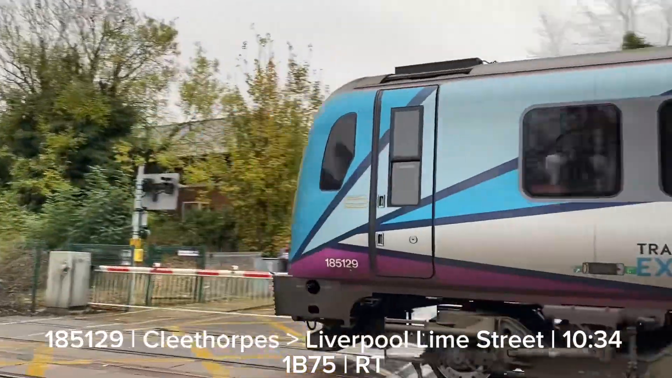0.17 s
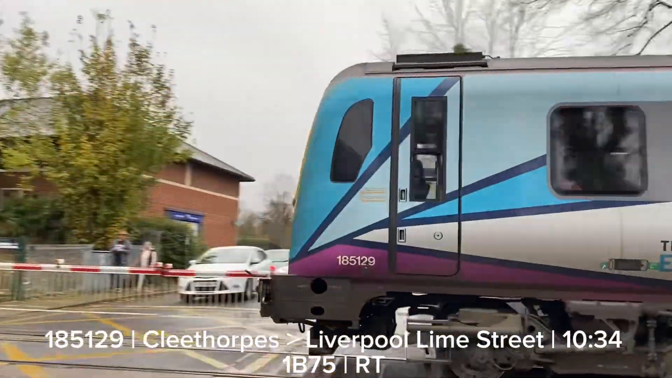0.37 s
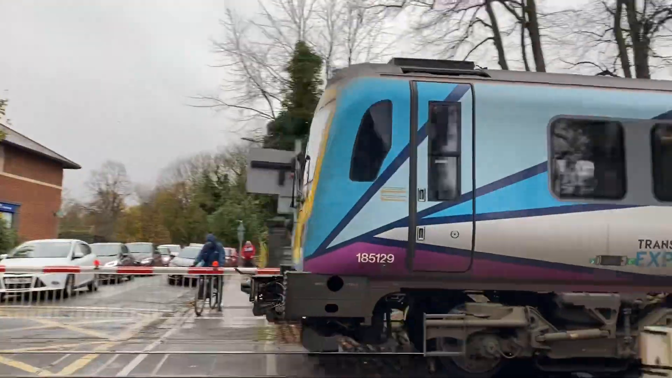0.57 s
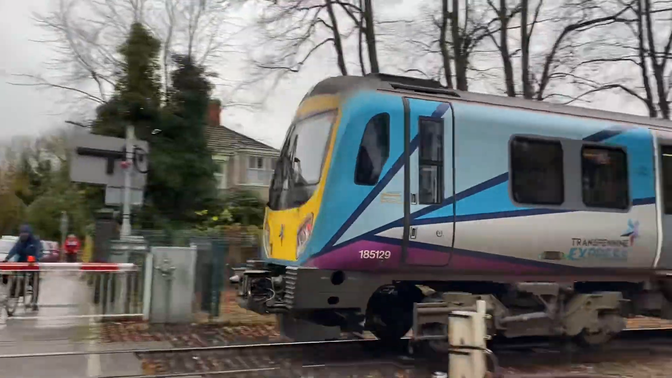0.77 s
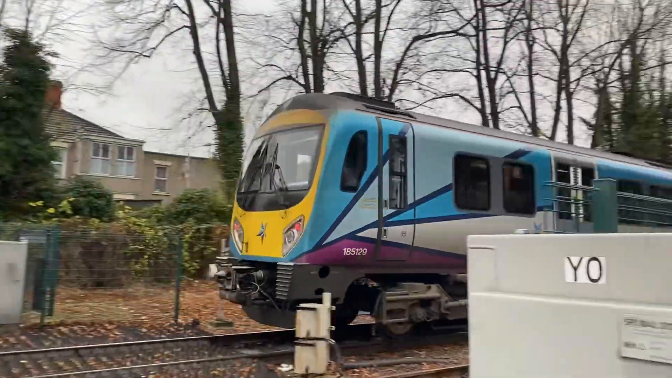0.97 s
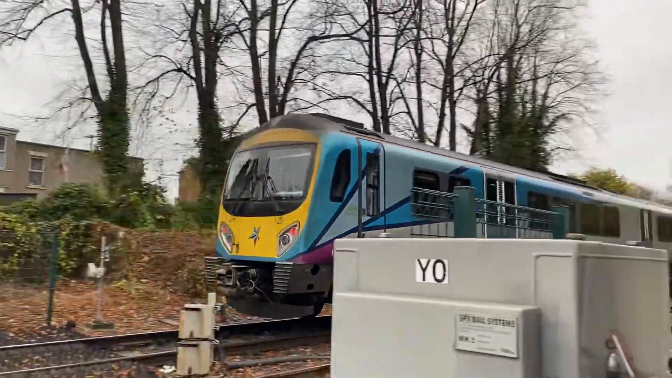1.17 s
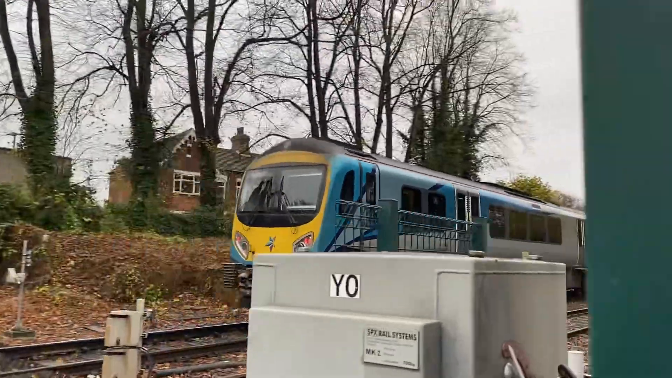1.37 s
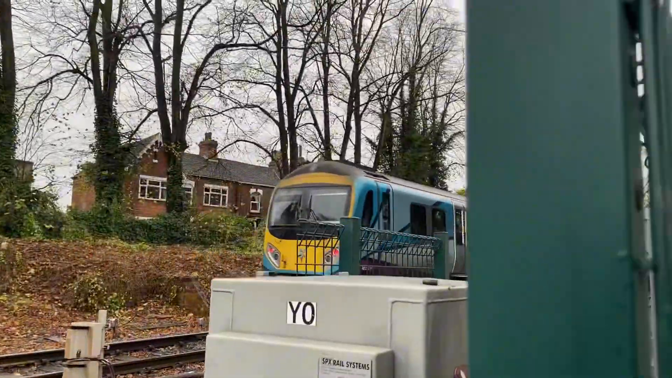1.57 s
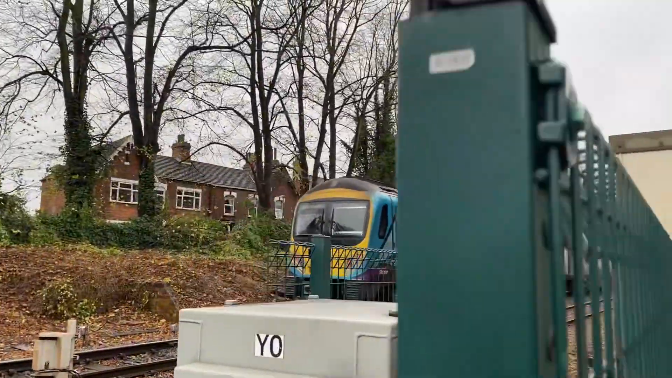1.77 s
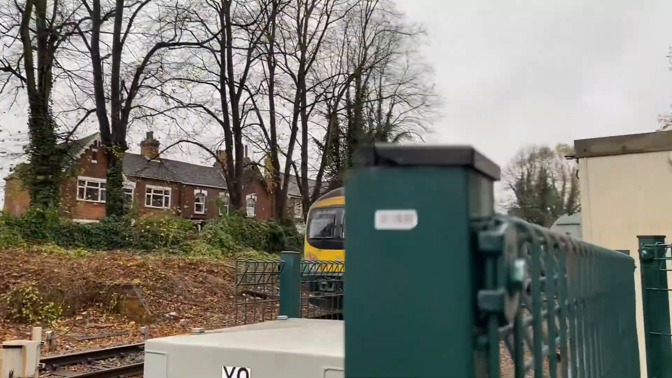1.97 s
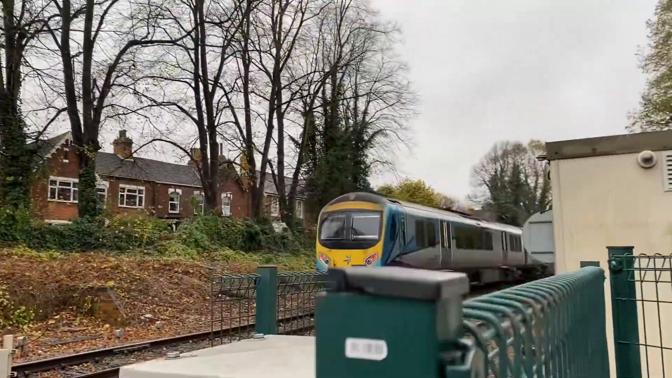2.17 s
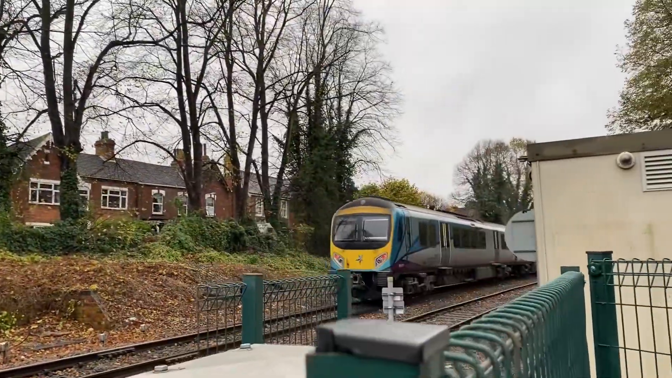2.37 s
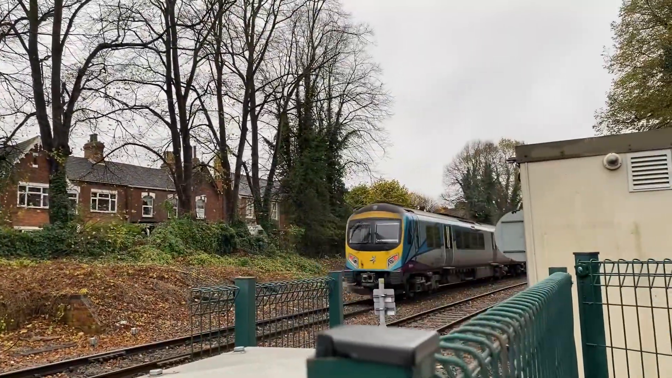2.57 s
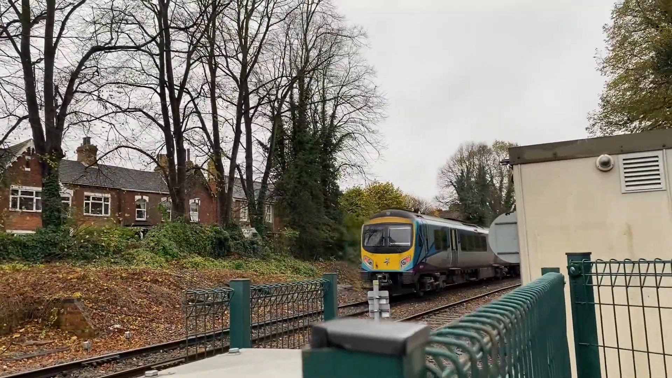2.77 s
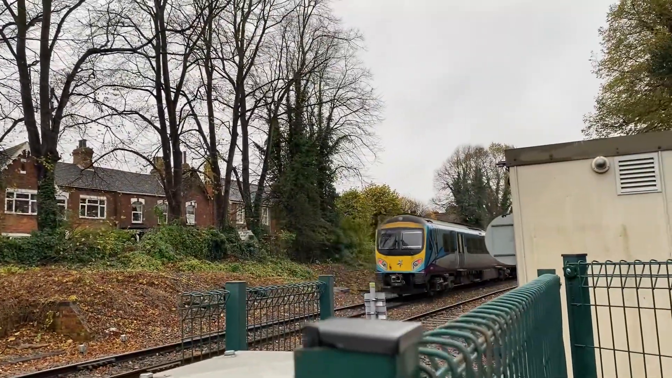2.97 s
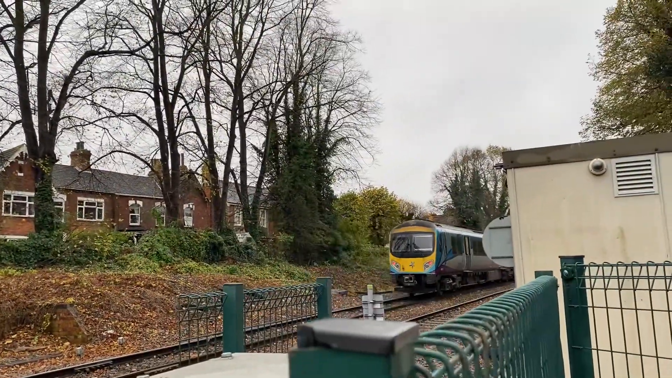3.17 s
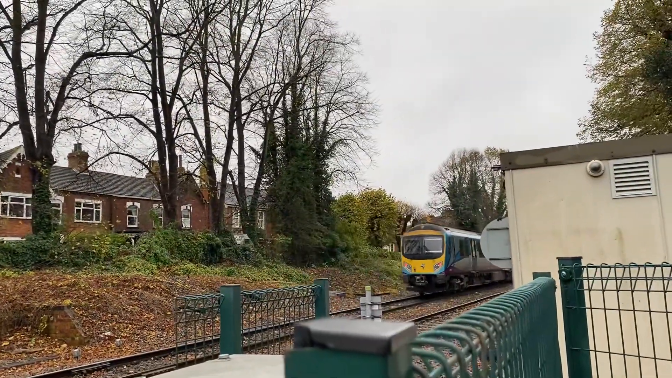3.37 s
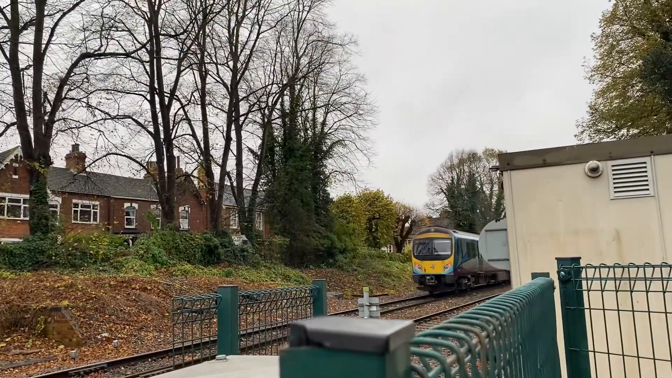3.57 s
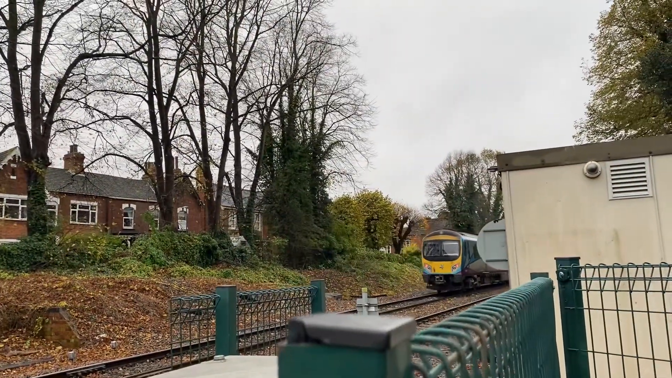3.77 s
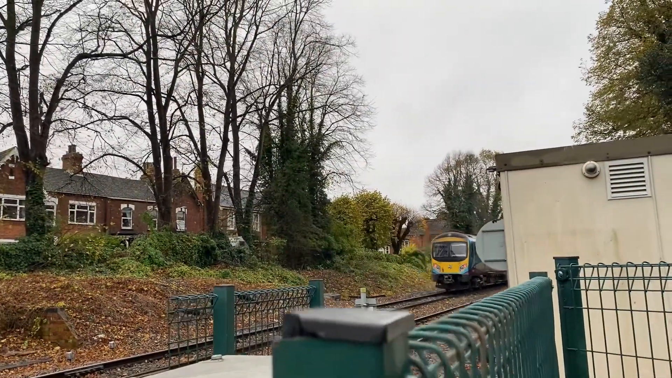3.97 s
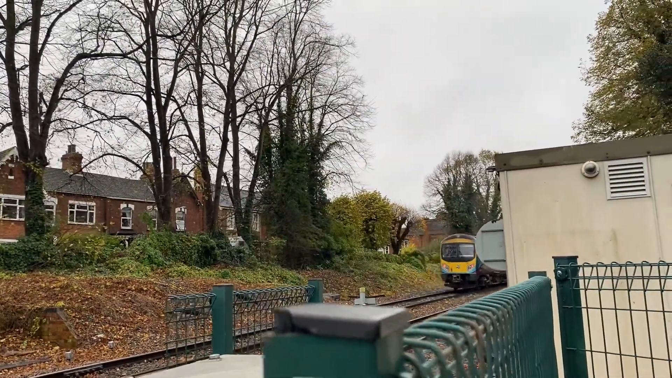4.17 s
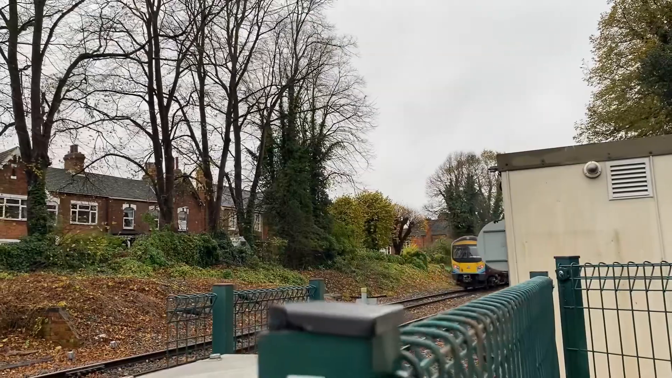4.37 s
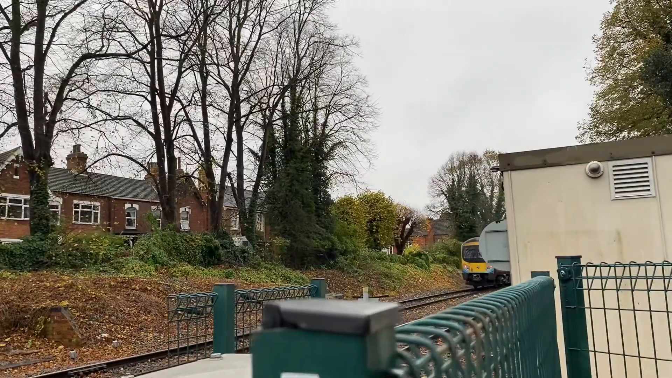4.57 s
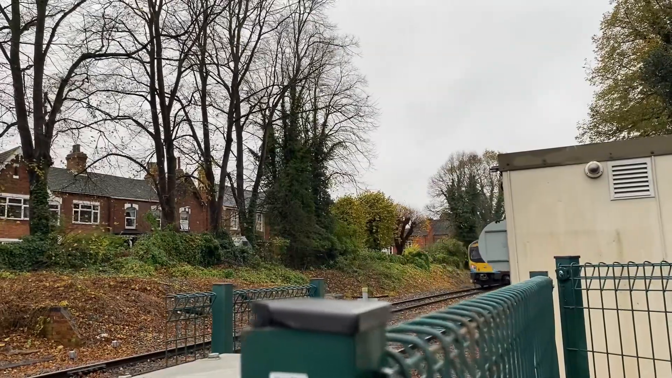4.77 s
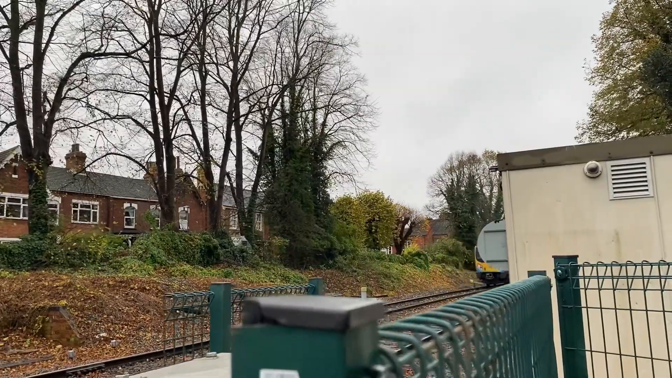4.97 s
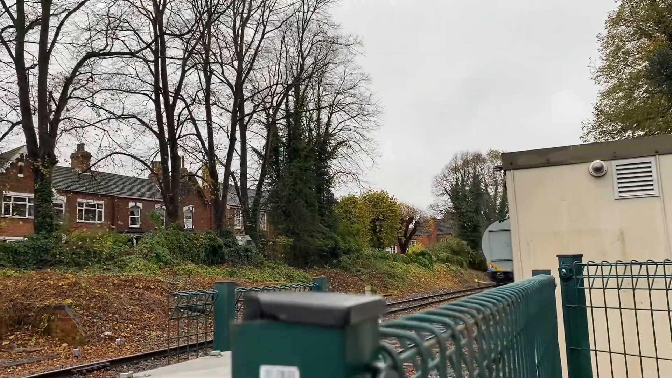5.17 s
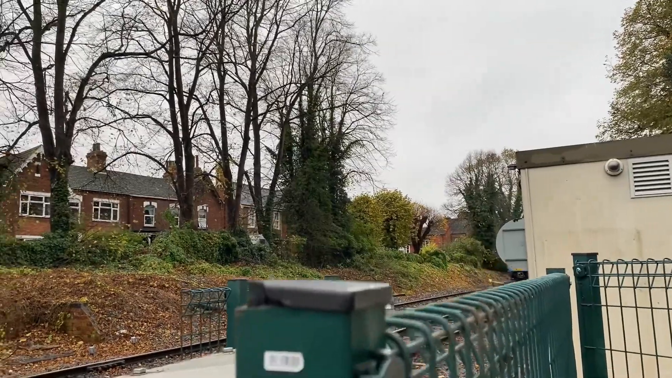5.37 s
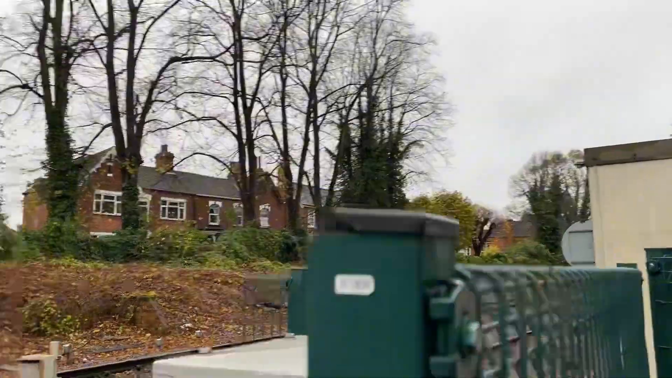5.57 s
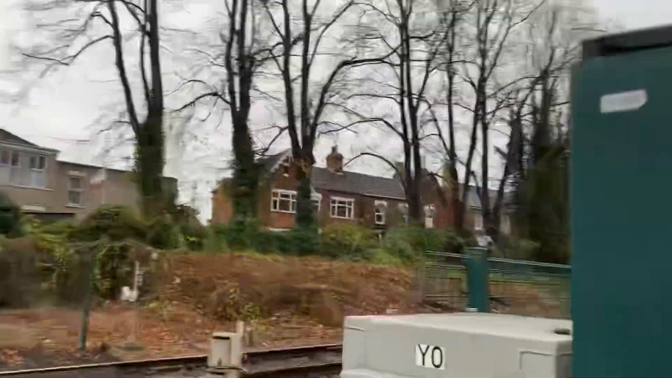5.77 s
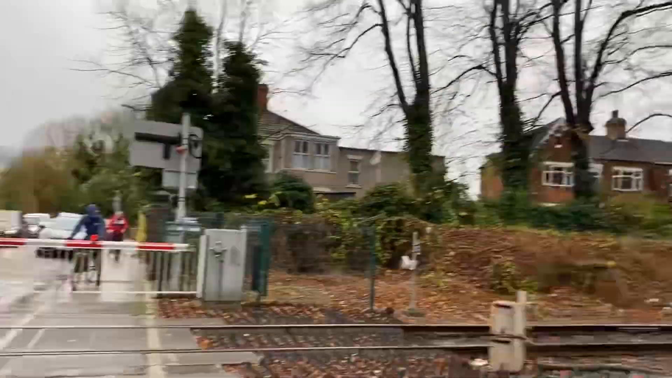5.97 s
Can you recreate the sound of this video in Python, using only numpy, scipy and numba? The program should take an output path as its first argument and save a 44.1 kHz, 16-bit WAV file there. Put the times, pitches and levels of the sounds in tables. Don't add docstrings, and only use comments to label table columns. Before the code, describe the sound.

The tail of a diesel train drones past close by, turbo whistle climbing, wheels thumping a rail joint, then recedes before soft handling bumps.

```python
import sys
import numpy as np
from scipy import signal
from scipy.fft import rfft, irfft
from scipy.io import wavfile
from scipy.ndimage import uniform_filter1d, map_coordinates
from numba import njit

SR = 44100
rng = np.random.default_rng(int(sys.argv[2]) if len(sys.argv) > 2 else 0)


def decibels_to_gain(level_db):
    exponent = np.asarray(level_db, float) / 20
    return 10 ** exponent


def generate_wav(sig):
    pcm = np.round(np.clip(np.atleast_2d(sig).T, -1, 1) * 32767).astype(np.int16)
    wavfile.write(sys.argv[1], SR, pcm)


N = 265482
TIME = np.arange(N) / SR
FREQ = np.arange(N // 2 + 1) * SR / N
QUARTER_TURN = np.array([[0], [np.pi / 2]])

# t/s, f/Hz
FIRING_RATE = [(0, 92.5), (.5, 92.54), (1, 93.93), (2, 95.69), (3, 97.47), (3.45, 99.87), (4, 100.8),
               (5, 100.7), (6.02, 100.8)]
# t/s, level/dB
DRONE_LEVEL = [(0, -16.5), (.6, -19), (.76, -16), (1.1, -15.5), (1.3, -19.5), (1.65, -16.5), (1.8, -19.5),
               (2.3, -24), (2.75, -27), (3, -34.5), (3.45, -34), (3.56, -30), (4.1, -28.5), (4.9, -30.5),
               (5.5, -26), (5.72, -28), (6.02, -32)]
# t/s, change/dB, lasting/s
DRONE_DIPS = [(.69, -6, 0.013), (2.6, -8, 0.016), (2.88, -9, .04), (3.23, -12, 0.055), (3.97, -25, 0.025),
              (4.56, -14, 0.015), (4.66, -15, 0.018), (4.83, -10.5, 0.04), (5.57, -1, 0.025),
              (5.67, -13, 0.012), (5.81, -28, 0.055)]
# multiple of the cycle, then close, past, leaving and far level/dB
ENGINE_TONES = [(3, -34, -41, -35, -38.5), (14.07, -44, -47, -56, -47), (5.02, -50, -50, -54, -39.5),
                (6.96, -48, -42, -35, -54), (8.97, -33.5, -34.5, -38, -60), (9.99, -37.5, -36, -38, -57),
                (12.07, -35, -37, -48, -47), (15.03, -42, -47.5, -38, -40), (18.12, -38, -39, -41, -42),
                (20.05, -36.5, -35, -39, -56.5), (21.07, -41, -39, -39, -45), (27.4, -41.5, -45, -52, -54),
                (33.36, -47, -46, -44, -49.5), (36.05, -36, -38, -53, -49.5)]
PLACE_TIMES = [0.4, 1.4, 2.46, 4]
# t/s, breath f/Hz, breath level/dB, blade tone f/Hz, tone over breath level/dB
TURBO_GLIDE = [(0, 7480, -47.5, 7300, -3), (.6, 7600, -46, 7445, -3), (1.15, 7740, -41, 7580, -5),
               (1.4, 7830, -46, 7650, -3), (1.9, 7983, -39, 7800, -4), (2.8, 8280, -39.5, 8130, -7),
               (3.5, 8580, -45.5, 8410, -3), (4, 8760, -51, 8570, 3), (4.7, 8900, -54.5, 8770, -1),
               (6.02, 9000, -60, 8950, -6)]
# t/s, peak level/dB, lowest ring f/Hz, brightness level/dB
JOINT_BLOWS = [
    (0.99, -10.5, 245.5, -5),
    (1.246, -6.5, 225, -14),
    (1.62, -23, 198, -3),
    (1.66, -17.5, 182.5, -8),
    (1.968, -19, 179.7, -16),
    (2.24, -24, 244, -0.5),
    (2.422, -42, 292.5, -5),
]
# f/Hz, width/Hz, level/dB
WHEEL_RING = [(333, 234, 4), (705, 270, 3), (898, 300, -6.5), (1190, 800, -9.5), (1700, 420, -22.5),
              (2220, 180, -12.5), (3300, 500, -42)]
# f/Hz, width/Hz, level/dB, loudest t/s, lasting/s
NOISE_SWELLS = [(437, 69, -36.5, 0.3, 1.48), (826, 90, -37, 1.61, 0.22), (822, 170, -41, 4.12, 1),
                (1740, 120, -37.5, 0.35, 0.55), (1697.6, 65, -40.5, 1.74, 0.99),
                (1245, 160, -38.5, 2.26, 0.31), (6360, 760, -56, 2.64, .9), (1400, 700, -47, 4.5, .5),
                (1700, 500, -50, 5.7, .2), (390, 90, -37, 1.55, .2), (2900, 500, -54, 4.3, .6),
                (200, 60, -40, 5.75, .1), (1930, 1300, -34, 0.14, 0.68), (2670, 420, -47, 2.84, 0.46),
                (2970, 800, -45, 2.1, 0.28), (3370, 67, -50.5, 2.75, 0.53), (4300, 840, -44, 0.12, 0.41),
                (5000, 1100, -51.5, 2.95, 1.47), (7500, 6000, -55.5, 5.66, 0.062),
                (890, 1150, -27.5, 0.057, .3), (557, 74, -42.5, 3.95, 0.8), (2320, 640, -43, 2.1, 0.64),
                (326, 78, -45, 2.5, 0.71), (2646, 68, -47, 2.9, 0.16), (1356, 60, -43, 1.95, 0.18),
                (1674, 50, -43, 2.15, .2), (313, 57, -36.5, 1.2, 0.36), (187, 50, -30, 1.4, 0.05),
                (259, 87, -43, 3.64, 0.45), (3130, 760, -50.5, 2.73, 0.39), (1940, 210, -43.5, 1.2, 0.54),
                (4500, 1500, -54, 4.53, 0.76)]
# f/Hz, level/dB per Hz
RUMBLE_COLOUR = [(41, -14), (70, 1.5), (114, 0), (166, -10.5), (262, -7), (334, -5.5), (411, -13.5),
                 (553, -14.5), (600, -20), (780, -37), (1320, -120)]
# f/Hz, level/dB per Hz
CLATTER_COLOUR = [(240, -46), (400, -12), (427, -11.5), (499, -15), (557, 1), (599, -4), (819, -2.5),
                  (985, -6.5), (1490, -8), (2270, -12.5), (3600, -31.5), (4680, -53), (7920, -120)]
# f/Hz, level/dB per Hz
FAN_COLOUR = [(2600, -0.5), (3200, 1), (3800, -4), (4600, -4.5), (5800, -9.5), (7000, -10), (9000, -12),
              (9700, -29)]
# f/Hz, level/dB per Hz
VENT_COLOUR = [(9500, 1), (10500, -7), (12000, -1.5), (13700, -5.5), (14500, -5), (16000, -4)]
# t/s, change/dB, lasting/s
HISS_CHANGES = [(1.38, -4.5, 0.12), (1.9, 1, 0.086), (2.92, 3, 0.094), (3.58, 5, 0.022), (3.76, 8, 0.019),
                (3.93, 8, 0.062), (4.25, 5, 0.028), (4.36, 8, .025), (4.51, 16.5, 0.052), (5.13, 9, 0.04),
                (5.2, 9, 0.022), (5.35, 5.5, 0.097), (5.55, 9, 0.063), (5.7, 7, .05), (5.82, 6, 0.033),
                (5.9, 8, 0.034), (5.6, 8.5, 0.74), (4.75, -3, 0.16)]
# f/Hz, level/dB per Hz
GROUND_COLOUR = [(20, -12), (30, -22), (40, -10), (50, 9), (65, -8), (85, -10), (110, -20.5)]
# t/s, level/dB
BODY_SHADE = [(0, 0), (5.68, -2.5), (5.74, -5.5), (6.02, -5.5)]
# t/s, peak level/dB, centre f/Hz
HAND_CLICKS = [
    (5.521, -40, 5000),
    (5.54, -42, 5000),
    (5.765, -21, 1090),
]
# t/s, peak level/dB
GRIP_JOLTS = [(5.553, -20), (5.672, -30), (5.697, -25), (5.716, -21), (5.736, -23), (5.764, -20),
              (5.812, -27), (5.829, -26), (5.874, -31), (5.936, -31), (5.992, -26), (6.006, -27)]
# f/Hz, phase/radians
PORT_LAG = [(0, 0), (90, -.11), (260, -.25), (1100, -1.2), (1750, -3.1), (2450, -6.3), (3200, -8.1),
            (3900, -6.2), (6800, -6.3), (7490, -4.4), (8150, -4)]
# f/Hz, half turns
TOP_LAG = [(8450, -1), (9900, -1), (10300, 0), (13700, 0), (13950, -1)]
# f/Hz, phase/radians
ALONGSIDE_LAG = [(2450, 0), (2650, -2.3), (2850, -1.8), (3100, -.5), (3450, -.8), (3960, 0)]
# f/Hz, likeness/0-1, left minus right level/dB
PORT_LIKENESS = [(60, .993, 0), (120, .99, 0), (260, .93, -.5), (600, .82, -2.7), (950, .7, -4),
                 (1600, .45, 0), (2200, .72, 1.2), (3000, .55, -1.7), (4200, .55, 0), (5500, .4, .5),
                 (6500, .9, 0), (7500, .9, 2)]
# t/s, lead/ms
PHONE_TURN = [(0, .19), (.35, .15), (.7, .03), (1.15, -.09), (1.6, 0), (6.02, 0)]


def curve(table):
    s, *columns = np.transpose(table)
    return [np.interp(TIME, s, c) for c in columns]


def bumps(events):
    return sum(db * np.exp(-((TIME - s) / lasting) ** 2) for s, db, lasting in events)


def unit(x):
    return x / np.sqrt(np.mean(x ** 2))


def walk(rate):
    k = int(SR / rate)
    held = np.repeat(rng.standard_normal(N // k + 1), k)
    return 1.39 * uniform_filter1d(uniform_filter1d(held, k), k)[:N]


@njit
def svf(x, hz, width):
    y, b, l = np.empty(len(x)), 0., 0.
    for i in range(len(x)):
        g, k = np.tan(np.pi * hz[i] / SR), width[i] / hz[i]
        v = (b + g * (x[i] - l)) / (1 + g * (g + k))
        b, l, y[i] = 2 * v - b, l + 2 * g * v, k * v
    return y


def steep(rows, hz, width):
    flat = np.ones(rows.shape[-1])
    hz, width = hz * flat, width * flat
    return np.array([svf(svf(row, hz, width), hz, width) for row in rows])


def rush(colour, source, drift_db, flicker_db):
    hz, db = np.transpose(colour)
    octave = np.log2(np.maximum(FREQ, 1))
    full = rfft(source) * decibels_to_gain(np.interp(octave, np.log2(hz), db, left=-90, right=-90))
    out = 0
    for centre in np.arange(np.log2(hz[0]), np.log2(hz[-1]) + .5, .5):
        band = irfft(full * np.clip(1 - 2 * abs(octave - centre), 0, 1), N)
        out = out + band * decibels_to_gain(drift_db * walk(1.93) + flicker_db * walk(12))
    return unit(out)


def passing(abreast_db, abreast_s, spreading, loss_db_per_m, town_db, shade):
    speed_m_s, track_m = 8.9, 6.63
    metres = np.hypot(speed_m_s * (TIME - abreast_s), track_m)
    near = decibels_to_gain(abreast_db - loss_db_per_m * (metres - track_m)) * (track_m / metres) ** spreading
    return np.hypot(near, decibels_to_gain(town_db)) * decibels_to_gain(shade * curve(BODY_SHADE)[0])


def engine(cycle):
    wobble = 0.16 * walk(16)
    drone_db = curve(DRONE_LEVEL)[0] + bumps(DRONE_DIPS)
    flutter_db = (-0.28 + .5 * TIME) * walk(18)
    out = np.sqrt(2) * decibels_to_gain(drone_db + flutter_db) * np.sin(6 * cycle + wobble + QUARTER_TURN)
    for order, *place_db in ENGINE_TONES:
        level_db = np.interp(TIME, PLACE_TIMES, place_db) + curve(BODY_SHADE)[0] + 2.6 * walk(9)
        smear = (.25 + order / 80) * (.4 + TIME / 13)
        turn = rng.uniform(0, 2 * np.pi, (2, 1)) + smear * walk(12)
        out = out + np.sqrt(2) * decibels_to_gain(level_db) * np.sin(order * cycle + turn)
    return out


def turbo():
    hz, level_db, tone_hz, tone_db = curve(TURBO_GLIDE)
    air = unit(steep(rng.standard_normal((2, N)), hz, 740))
    turns = np.cumsum(tone_hz + 12 * walk(30)) / SR
    tone = np.sin(2 * np.pi * turns + QUARTER_TURN) * decibels_to_gain(tone_db + 3 * walk(8))
    return decibels_to_gain(level_db + 1.6 * walk(12)) * (air + tone)


def joints():
    size = SR // 5
    t, out = np.arange(size) / SR, np.zeros((2, N + size))
    knock_hz, knock_s = 725, .004
    for s, peak_db, low_hz, bright_db in JOINT_BLOWS:
        fade = np.exp(-(t / 0.036) ** 2) + 0.37 * np.exp(-t / 0.079)
        blow = rng.standard_normal((2, size)) * np.minimum(t / 0.0043, 1) * fade
        ring = sum(decibels_to_gain(db) * unit(steep(blow, hz, width)) for hz, width, db in WHEEL_RING)
        knock_shape = t / knock_s * np.exp(1 - t / knock_s)
        knock = decibels_to_gain(-1.5) * 4 * np.sin(2 * np.pi * knock_hz * t + QUARTER_TURN) * knock_shape
        late = np.maximum(t - 0.0041, 0) / 0.013
        sleeper = np.sin(2 * np.pi * low_hz * t + QUARTER_TURN) * (late * np.exp(1 - late)) ** 2.8
        bright = decibels_to_gain(bright_db + 1.1 * (peak_db + 6.5))
        start = int((s - .0135) * SR)
        out[:, start:start + size] += decibels_to_gain(peak_db) * (sleeper + bright * (ring + knock) / 4)
    return out[:, :N]


def noise_swells():
    out = 0
    for hz, width, db, s, lasting in NOISE_SWELLS:
        level_db = db - 5.9 * ((TIME - s) / lasting) ** 2
        out = out + decibels_to_gain(level_db) * unit(steep(rng.standard_normal((2, N)), hz, width))
    return out * decibels_to_gain(curve(BODY_SHADE)[0])


def rolling():
    gain = passing(abreast_db=-24.5, abreast_s=0.6, spreading=1, loss_db_per_m=-0.22, town_db=-37.5, shade=1.0)
    return gain * rush(RUMBLE_COLOUR, rng.standard_normal((2, N)), drift_db=.5, flicker_db=2.0)


def clatter(cycle):
    throb = 1 + 0.05 * np.sin(cycle) + 0.069 * np.sin(2 * cycle) + 0.028 * np.sin(6 * cycle)
    gain = passing(abreast_db=-30.5, abreast_s=1.26, spreading=.5, loss_db_per_m=-0.0271,
                   town_db=-47.5, shade=.9)
    return gain * rush(CLATTER_COLOUR, rng.standard_normal((2, N)) * throb, drift_db=1.1, flicker_db=1.5)


def fans():
    gain = passing(abreast_db=-40.5, abreast_s=1.5, spreading=1.3, loss_db_per_m=0.3, town_db=-51.5, shade=.1)
    return gain * rush(FAN_COLOUR, rng.standard_normal((2, N)), drift_db=1.5, flicker_db=1.6)


def vent():
    drop_db = -11 / (1 + np.exp((3.75 - TIME) / 0.16))
    change_db = drop_db + bumps(HISS_CHANGES) + 2.2 * walk(8)
    gain = passing(abreast_db=-55, abreast_s=1, spreading=0.15, loss_db_per_m=0.27, town_db=-84, shade=0)
    hiss = rush(VENT_COLOUR, rng.standard_normal((2, N)), drift_db=0.0, flicker_db=1.0)
    return gain * decibels_to_gain(change_db) * hiss


def ground():
    gain = passing(abreast_db=-36, abreast_s=1.7, spreading=0.9, loss_db_per_m=-0.5, town_db=-35, shade=2.5)
    return gain * rush(GROUND_COLOUR, rng.standard_normal((2, N)), drift_db=1.0, flicker_db=3.0)


def hand():
    out = 0
    for s, peak_db, hz in HAND_CLICKS:
        tick = rng.standard_normal((2, N)) * (TIME > s) * np.exp(-abs(TIME - s) / 0.0018)
        out = out + decibels_to_gain(peak_db + 3.0) * steep(tick, hz, 1.5 * hz)
    return out


def jolts():
    rest_hz, extra_hz, sag_s, rise_s = 100, 600, .0035, .011
    out = 0
    for s, peak_db in GRIP_JOLTS:
        t = np.maximum(TIME - s, 0)
        turns = rest_hz * t + extra_hz * sag_s * (1 - np.exp(-t / sag_s))
        shape = (t / rise_s * np.exp(1 - t / rise_s)) ** 1.3
        out = out + decibels_to_gain(peak_db) * shape * np.sin(2 * np.pi * (turns + rng.uniform()))
    return out * np.array([[1], [-1]])


def ports(sound):
    shared, own = rfft(sound)
    hz, like, tilt_db = np.transpose(PORT_LIKENESS + [(8450, 1, 0)])
    like = np.interp(np.log(FREQ + 1), np.log(hz), np.clip(like, 0, 1))
    tilt_db = np.interp(np.log(FREQ + 1), np.log(hz), tilt_db)
    top_lag = [(f, np.pi * half) for f, half in TOP_LAG]
    lag = np.exp(-1j * np.interp(FREQ, *np.transpose(PORT_LAG + top_lag)))
    near_lag = lag * np.exp(-1j * np.interp(FREQ, *np.transpose(ALONGSIDE_LAG)))

    def blend(like, lag):
        return (like * lag * shared + np.sqrt(1 - like ** 2) * own) * decibels_to_gain(-tilt_db / 2)

    right = blend(like, lag)
    near = blend(like ** .5, near_lag)
    alongside = np.clip((.45 - TIME) / .15, 0, 1)

    def part(share):
        return irfft(right * share, N) + alongside * irfft((near - right) * share, N)

    low = np.clip((2200 - FREQ) / 1200, 0, 1)
    place = np.arange(N) + curve(PHONE_TURN)[0] * SR / 1000
    turned = map_coordinates(part(low), [place], order=3, mode="nearest")
    return np.array([irfft(shared * decibels_to_gain(tilt_db / 2), N), turned + part(1 - low)])


def scene():
    cycle = 2 * np.pi * np.cumsum(curve(FIRING_RATE)[0]) / 6 / SR
    edge = np.clip(np.minimum(TIME, TIME[-1] - TIME) / .002, 0, 1)
    whistle = turbo()
    train = engine(cycle) + whistle + noise_swells() + rolling() + clatter(cycle) + fans() + vent() + ground()
    heard = ports(edge * (train + hand()))
    in_step = .19 * np.clip(5.1 - TIME, 0, 1) * decibels_to_gain(2. * walk(14)) * whistle[1]
    wheels = joints()
    blows = wheels[0] + .2 * wheels[1] * np.array([[1], [-1]])
    return heard + edge * (jolts() + in_step) + blows


def top_cut(x):
    return signal.sosfilt(signal.butter(12, 15800, fs=SR, output="sos"), x)


def record(dry):
    return top_cut(dry)


dry = scene()
out = record(dry)
generate_wav(out)
```